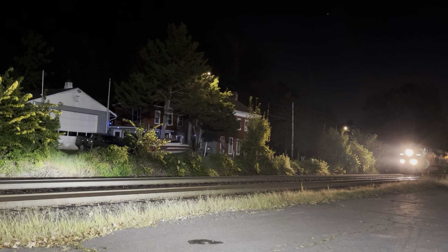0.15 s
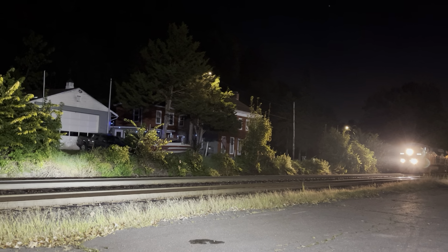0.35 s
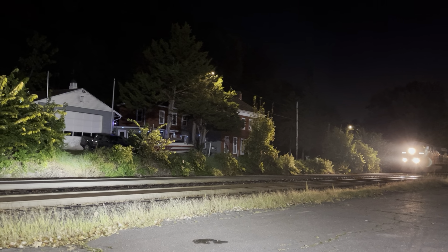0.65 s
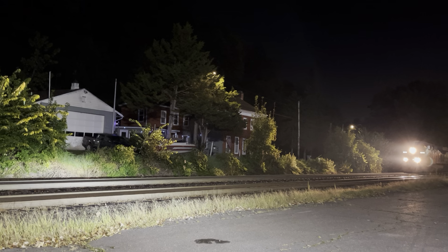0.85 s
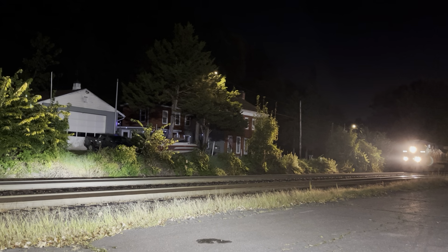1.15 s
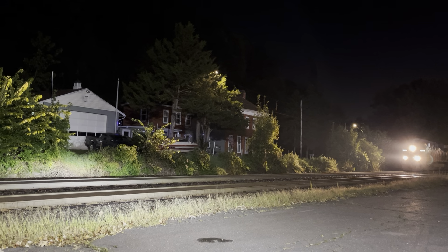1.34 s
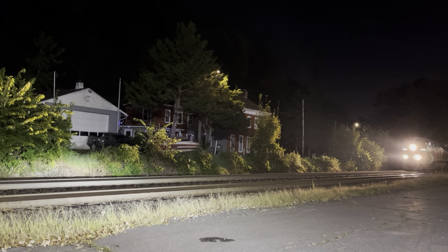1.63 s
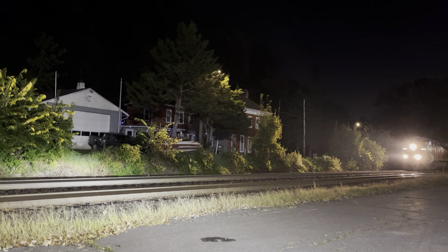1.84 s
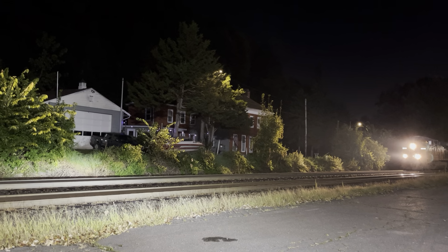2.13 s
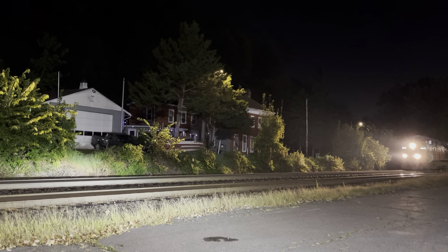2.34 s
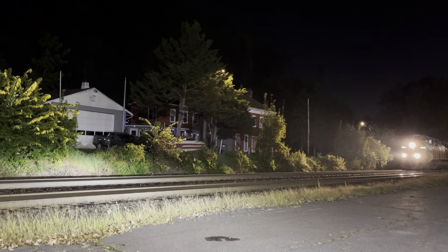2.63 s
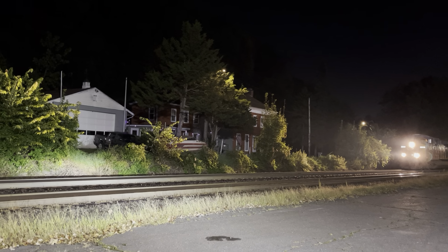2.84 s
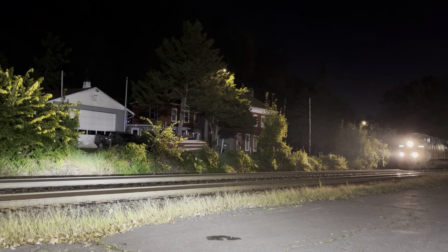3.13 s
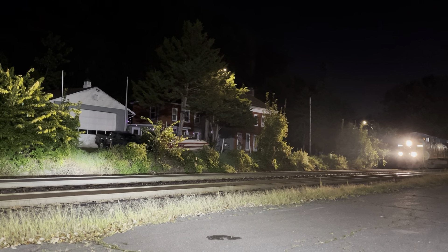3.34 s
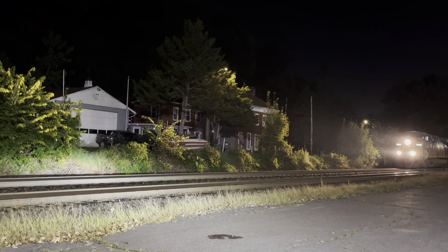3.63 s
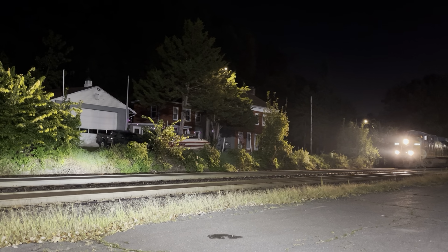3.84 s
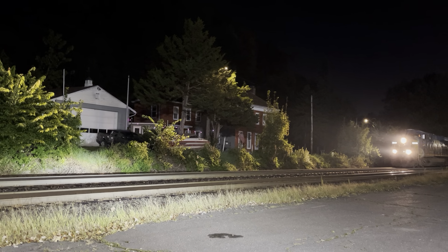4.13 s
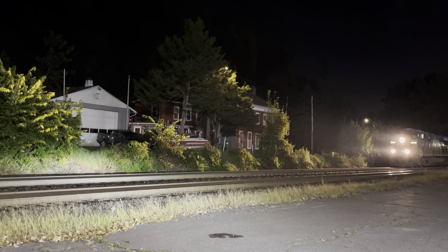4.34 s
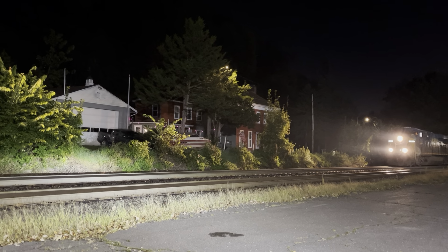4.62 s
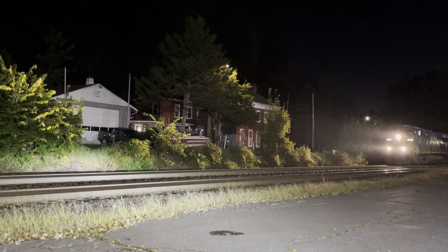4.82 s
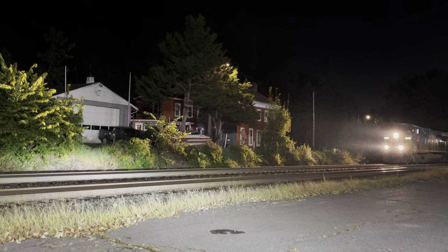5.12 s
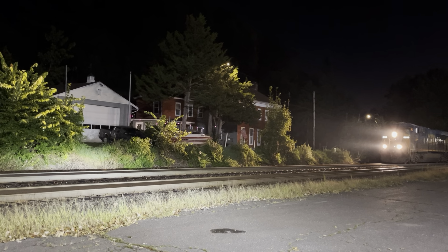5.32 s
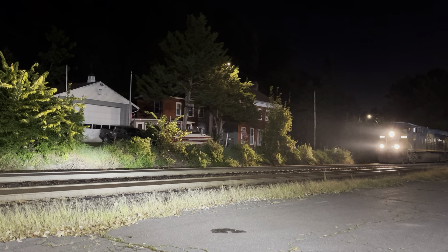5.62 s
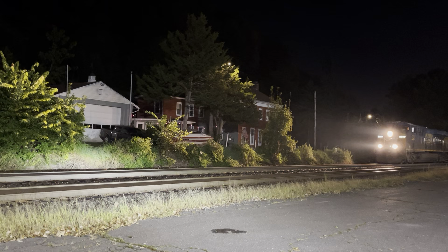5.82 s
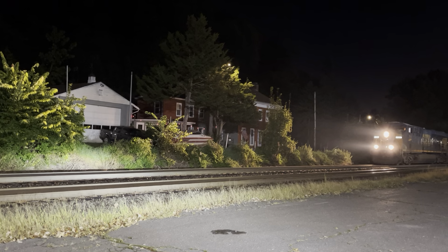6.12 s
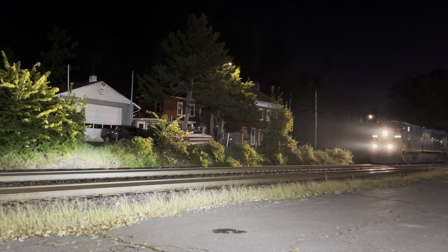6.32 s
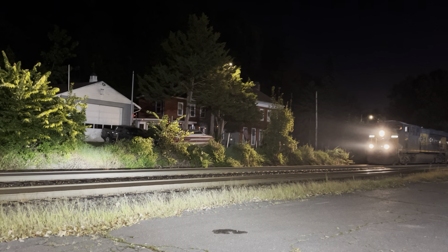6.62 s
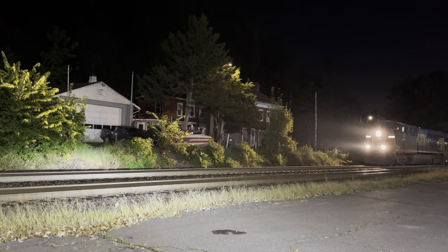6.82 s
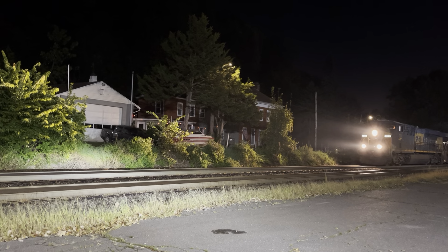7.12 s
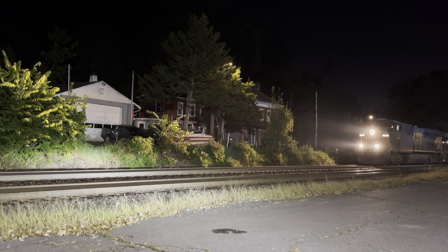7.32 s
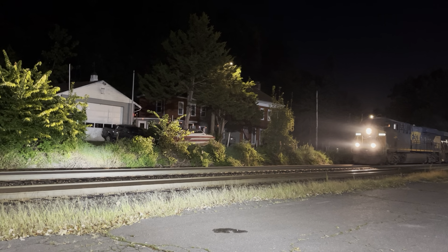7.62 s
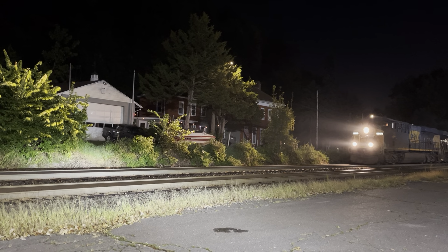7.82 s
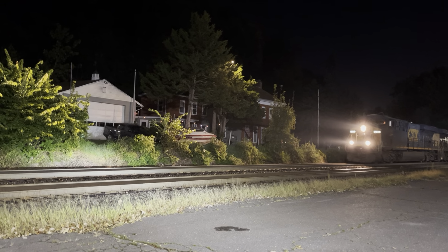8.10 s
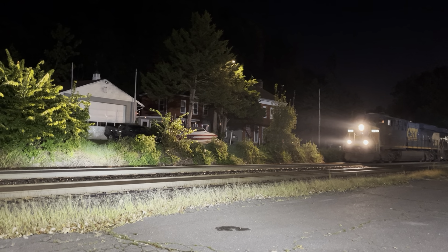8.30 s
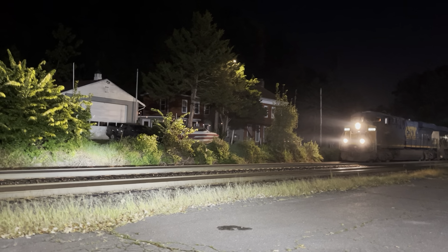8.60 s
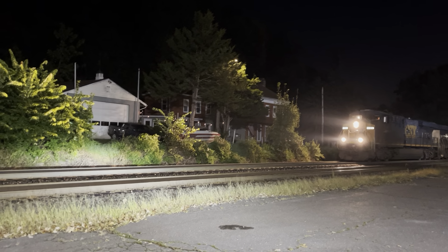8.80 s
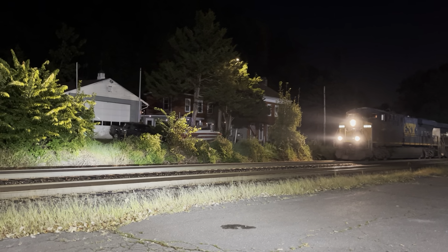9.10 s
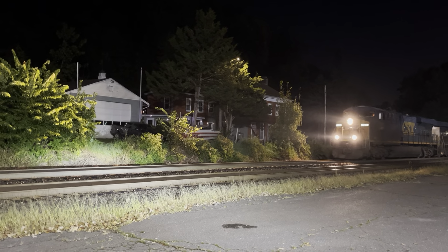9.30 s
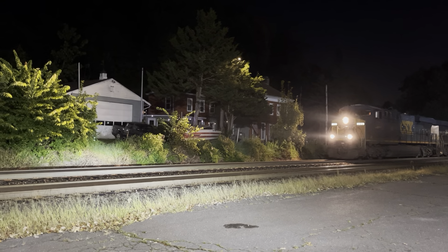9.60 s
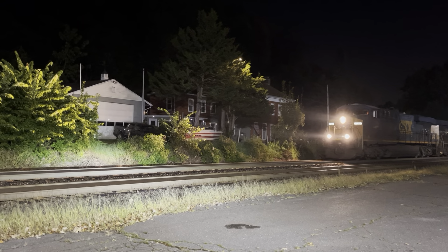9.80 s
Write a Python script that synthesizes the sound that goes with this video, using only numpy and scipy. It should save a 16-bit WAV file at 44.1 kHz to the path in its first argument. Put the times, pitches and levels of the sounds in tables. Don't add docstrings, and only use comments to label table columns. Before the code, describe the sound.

A heavy, throbbing low engine drone fills the roadside as a freight train approaches, with faint gear whine and one brief wagon groan.

```python
import sys
import numpy as np
from scipy import signal
from scipy.fft import rfft, irfft, next_fast_len
from scipy.io import wavfile
from scipy.ndimage import uniform_filter1d, map_coordinates

SR = 44100
rng = np.random.default_rng(int(sys.argv[2]) if len(sys.argv) > 2 else 0)


def digitize_waveform(pressure):
    field = np.atleast_2d(pressure).T
    bounded = np.clip(field, -1, 1)
    quanta = np.round(bounded * 32767).astype(np.int16)
    wavfile.write(sys.argv[1], SR, quanta)


def invert_db(level):
    return 10 ** (np.asarray(level, dtype=float) / 20)


N = 438794

# (time [s], level [dB])
MOTORS_IN_VIEW = [
    (0, -4),
    (2.5, 2.2),
    (4, 2.5),
    (5.8, 0.7),
    (8.3, -2.5),
    (8.9, -11.5),
    (9.95, -5),
]


def unit(x):
    return x / np.sqrt(np.mean(x ** 2) + 1e-20)


def along(points, hz):
    f, v = np.transpose(points)
    return np.interp(np.log(hz + 1), np.log(f + 1), v)


def curves(rows):
    s, *cols = np.transpose(rows)
    return [np.interp(np.arange(N) / SR, s, c) for c in cols]


def wobble(rate):
    coarse = np.arange(0, N + 64, 64)
    knots = rng.standard_normal(int(N * rate / SR) + 4)
    smooth = map_coordinates(knots, [coarse * rate / SR])
    return np.interp(np.arange(N), coarse, smooth)


def filtered(x, response):
    m = next_fast_len(N + 8192)
    return irfft(rfft(x, m) * response(np.fft.rfftfreq(m, 1 / SR)), m)[..., :N]


def tone(turns, db):
    return np.sqrt(2) * invert_db(db) * np.cos(2 * np.pi * turns)


def envelope(start, attack, hold, release):
    t = np.arange(N) / SR - start
    return np.clip(np.minimum(t / attack, (attack + hold + release - t) / release), 0, 1)


def noise_pair(patchy_db):
    # (frequency [Hz], coherence [0-1])
    alike = [(100, 0.83), (350, 0.73), (800, 0.62), (1300, .25), (2000, 0.46), (2750, 0.6), (3400, 0.11),
             (3800, 0.87), (4800, 0.94), (5150, 0.39), (5800, 0.79), (6500, 0.55), (7500, 0.93),
             (11000, 0.38), (12000, 0.65)]
    z = signal.stft(rng.standard_normal((2, N)), nperseg=512)[2]
    patches = uniform_filter1d(rng.standard_normal(z.shape[1:]), 6, 0)
    patches = uniform_filter1d(patches, 20, 1)
    streaks = uniform_filter1d(rng.standard_normal(z.shape[1:]), 150, 1)
    gain = invert_db(patchy_db * unit(patches) + 1.4 * unit(streaks))
    pair = signal.istft(z * gain, nperseg=512)[1][:, :N]

    def mix(hz):
        turn = np.arccos(np.clip(along(alike, hz), 0, 1)) / 2
        return np.array([np.cos(turn), np.sin(turn)])

    mid, side = filtered(pair, mix)
    return np.array([mid + side, mid - side])


def rumble():
    # (frequency [Hz], level [dB per Hz])
    spectrum = [(25, -30.5), (45, -16.5), (85, -4), (120, -8), (160, -11.5), (200, -4.5), (260, -18),
                (400, -64.5)]
    noise = filtered(noise_pair(patchy_db=-1.4), lambda hz: invert_db(along(spectrum, hz)))
    return invert_db(-29.0 + 1.2 * wobble(0.92)) * unit(noise)


def groan():
    t = np.arange(N) / SR
    level_db = -32.5
    swell = envelope(6.76, attack=0.1, hold=0.13, release=0.2) ** 2
    low = tone(519 * t + 0.16 * wobble(35), level_db - 1.5)
    high = tone(535 * t + 0.13 * wobble(30), level_db - 3)
    return swell * (low + high)


def whine():
    # (time [s], hold [s], level [dB])
    surges = [(.36, .08, -43), (0.683, 0.073, -38.5), (1.5, .1, -45), (1.92, .05, -42), (2.38, 0.38, -42),
              (3.4, 0.046, -41), (3.635, 0.13, -39), (3.89, .03, -45), (4.202, 0.13, -41), (4.82, .24, -42),
              (5.56, .08, -42), (6.3, 1.6, -46.5), (7.997, .06, -43), (8.34, 0.17, -42)]
    # (frequency [Hz], level [dB])
    hum_tones = [(354, -45), (441.4, -47.5), (485, -56), (533, -54), (582, -51), (627, -55), (711, -55),
                 (887, -56)]
    t = np.arange(N) / SR
    steady_db, edge_s = -50.5, 0.053
    surge_db = sum((db - steady_db) * envelope(s - edge_s, edge_s, hold, edge_s) for s, hold, db in surges)
    turns = 1066.5 * t + 0.17 * wobble(16)
    db = steady_db + surge_db + 1.6 * wobble(5.5)
    gears = tone(turns, db) + tone(2 * turns, db - 9.5)
    hums = sum(tone(hz * t + 0.12 * wobble(9), level + 2.5 * wobble(2)) for hz, level in hum_tones)
    hum_gain = invert_db(curves(MOTORS_IN_VIEW)[0] + [[-.6], [.6]])
    return gears * invert_db([[-1.1], [1.9]]) + hums * hum_gain


def roar(drone):
    # (time [s], level [dB])
    flow = [(0, -0.5), (1.5, -0.5), (2.3, -.5), (4, 1), (5, 0), (6.3, -0.5), (7.5, 1.5), (8.5, 0.5),
            (9.95, -1)]
    # (frequency [Hz], level [dB per Hz])
    left = [(280, -6.5), (370, -16), (770, -25.5), (950, -23), (1500, -23.5), (1700, -21.5), (2100, -25),
            (2550, -32.5), (3600, -29), (5000, -33), (6600, -40), (7500, -36.5), (10800, -48.5),
            (11600, -51.5), (14600, -80)]
    # (frequency [Hz], level [dB per Hz])
    right = [(280, -7.5), (370, -14.5), (770, -23.5), (950, -20.5), (1500, -23), (1700, -18.5),
             (2100, -21.5), (2300, -24.5), (3700, -28), (5000, -29), (6000, -32), (7000, -37.5),
             (10800, -47.5), (11600, -51), (14600, -78.5)]
    range_db = [
        -36,
        -38,
        -38.5,
        -49,
    ]
    follows = [
        0.37,
        0.96,
        1.3,
        .6,
    ]
    approach = [
        0.19,
        -0.18,
        -0.1,
        .65,
    ]
    puff_db = (1.6, 0.8, 1.1, 2.0)

    puff = np.abs(signal.hilbert(drone, next_fast_len(N))[:N])
    puff = np.roll(puff / uniform_filter1d(puff, SR // 3), -260) - 1

    def colour(hz):
        low_cut = 1 + (305 / (hz + 1)) ** 8
        return invert_db([along(left, hz), along(right, hz)]) / low_cut

    noise = filtered(noise_pair(patchy_db=0.56), colour)
    below = [filtered(noise, lambda hz: 1 / (1 + (hz / edge) ** 4)) for edge in (950, 2400, 5800)]
    parts = np.diff([0 * noise, *below, noise], axis=0)

    flow_db = curves(flow)[0]
    since_mid = (np.arange(N) - N / 2) / SR
    levels = [db + f * flow_db + rise * since_mid for db, f, rise in zip(range_db, follows, approach)]
    levels[0] = levels[0] + 0.12 * curves(MOTORS_IN_VIEW)[0]
    chuff = 0.073 * wobble(12)
    total = 0
    for part, db, depth in zip(parts, levels, puff_db):
        flutter = chuff + 0.5 * wobble(14) + 0.58 * wobble(5)
        total = total + unit(part) * invert_db(db + 1.13 + depth * puff + flutter)
    return total


def exhaust():
    # (time [s], lead [cycles per s], second [cycles per s])
    speed = [(0.0, 7.4953, 7.4864), (0.59, 7.4802, 7.4677), (1.17, 7.4748, 7.4874), (1.76, 7.4781, 7.4948),
             (2.34, 7.4776, 7.4846), (2.93, 7.4622, 7.4887), (3.51, 7.475, 7.4542), (4.1, 7.4891, 7.4445),
             (4.68, 7.4812, 7.4516), (5.27, 7.4648, 7.4705), (5.85, 7.4749, 7.4831), (6.44, 7.4772, 7.4775),
             (7.02, 7.4644, 7.4722), (7.61, 7.4848, 7.4745), (8.19, 7.4686, 7.4708), (8.78, 7.4726, 7.5628),
             (9.36, 7.4797, 7.4808), (9.95, 7.4724, 7.4585)]
    crank = [
        [.0139],
        [.5761],
    ]
    # (time [s], lead [dB], second [dB])
    heard = [(0.0, 0.5, -1.5), (0.59, -3, -0.5), (1.17, 4.5, -1), (1.76, 1.5, -1.5), (2.34, 0.3, 0),
             (2.93, 2.2, -3.5), (3.51, 1, -2.2), (4.1, -11.5, 2), (4.68, -1.5, 1.5), (5.27, 3.5, 0.5),
             (5.85, 4, 0.5), (6.44, 1.5, 1.1), (7.02, -2.0, 2.5), (7.61, -7.5, 2.2), (8.19, -4.5, 3.5),
             (8.78, 4, -1.6), (9.36, 3, -1.5), (9.95, 1.5, 0.5)]
    # (time [s], lead [m], second [m])
    detour = [(0.0, 14.17, 9.79), (1.99, 13.4, 11.37), (3.98, 13.09, 11.72), (5.97, 13.39, 13.03),
              (7.96, 12.06, 13.4), (9.95, 11.4, 12.74)]
    echo_share = [
        [.41],
        [.28],
    ]
    strong_orders = (6, 9, 10, 11, 12, 13, 14, 15, 16, 20, 22, 26, 27, 28, 29)
    lead_db = (-33, -31, -56.5, -33.5, -22, -34, -39.5, -18.5, -35.5, -43.5, -36.5, -34, -44, -37, -48.5)
    second_db = (-29.5, -28.5, -35.5, -30, -14.5, -25.5, -30.5, -16.5, -33, -38.5, -51.5, -34, -35, -30.5,
                 -37)
    opposed = [
        (12, 14, 20, 27, 28, 29),
        (12, 13, 14, 20, 22, 27, 28, 29),
    ]
    # (order, level [dB])
    weak_orders = [(5, -48), (7, -42), (17, -37), (18, -37), (19, -40), (21, -37), (23, -44), (24, -39),
                   (25, -42), (30, -46), (31, -47), (32, -45), (33, -53), (34, -46), (37, -52), (41, -52),
                   (42, -51), (44, -49), (46, -48), (48, -52), (49, -48), (50, -47), (53, -51)]
    # (time [s], level [dB])
    bark = [(0, 0), (1.5, 0), (2.6, 1), (3.3, 2.5), (4.2, 1), (5, -0.5), (7, -1), (8.5, 0), (9.1, -1.5),
            (9.95, -1.5)]
    # (time [s], frequency [Hz])
    dip = [(0, 57), (1.5, 56), (2.3, 46), (3.5, 50), (4.4, 58), (5.1, 66), (5.6, 60), (6.1, 46), (8.7, 48),
           (9.3, 60), (9.95, 58)]
    stack_turns = 0.6324
    silencer_order, silencer_turns = 15, 0.1001

    cycles = crank + np.cumsum(curves(speed), axis=1) / SR
    heard_db = np.array(curves(heard))
    cycle_m = 343 / 7.472
    late = np.array(curves(detour)) / cycle_m
    bark_db, dip_hz = curves(bark)[0], curves(dip)[0]

    strong = 0
    for k, a, b in zip(strong_orders, lead_db, second_db):
        bank_turns = 0.5 * np.array([[k in orders] for orders in opposed])
        shift = stack_turns + silencer_turns * max(k - silencer_order, 0) + bank_turns
        phase = 2 * np.pi * (k * cycles + shift + 0.01 * wobble(5))
        if k > silencer_order:
            path_db = bark_db
        else:
            path_db = -8 * np.exp(-((k * speed[0][1] - dip_hz) / 6) ** 2)
        wave = np.cos(phase) + echo_share * np.cos(phase - 2 * np.pi * k * late)
        level_db = heard_db + [[a], [b]] + path_db + 0.76 * wobble(2.476)
        strong = strong + (np.sqrt(2) * invert_db(level_db) * wave).sum(axis=0)

    weak = 0
    for k, db in weak_orders:
        turns = k * cycles[1] + rng.random() + 0.12 * wobble(1.205)
        level_db = db - 0.46 + 3.57 * wobble(1.63) + 0.6 * heard_db[1] + bark_db * (k > silencer_order)
        weak = weak + tone(turns, level_db)
    return strong + weak


def at_ports(x):
    # (frequency [Hz], phase [radians])
    left_leads = [(0, 0), (950, -1.05), (1290, -1.6), (2240, -6), (2840, -7), (3960, -7), (4740, -8),
                  (5000, -4.5), (5430, -3.5), (6120, -4), (6720, -2.5), (8350, 0.14), (10200, 1.1),
                  (11000, 1), (11800, 4), (13400, 2.5), (14000, 1.5)]
    f, rad = np.transpose(left_leads)
    return filtered(x, lambda hz: np.exp(.5j * np.outer([1, -1], np.interp(hz, f, rad))))


def scene():
    drone = exhaust()
    train = rumble() + groan() + whine() + roar(drone) + drone * invert_db([[-.2], [.2]])
    return at_ports(train)


def band_limit(x):
    return signal.sosfilt(signal.butter(12, 14700, fs=SR, output="sos"), x)


def record(dry):
    soft = dry / (1 + np.abs(dry / 1.03) ** 6) ** (1 / 6)
    return band_limit(soft)


dry = scene()
out = record(dry)
digitize_waveform(out)
```